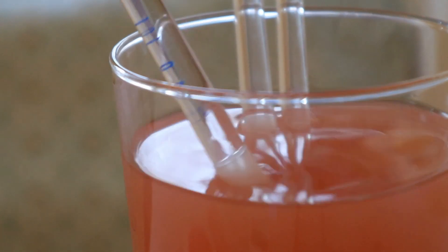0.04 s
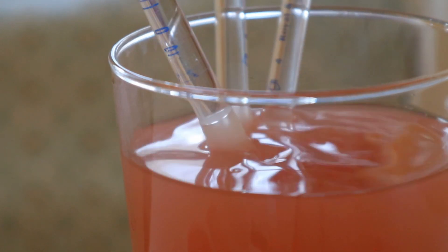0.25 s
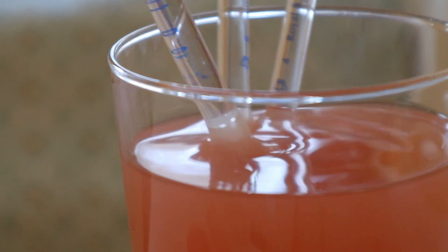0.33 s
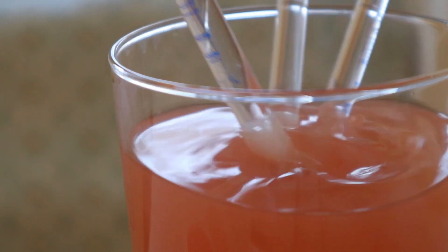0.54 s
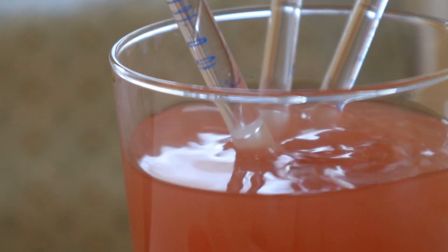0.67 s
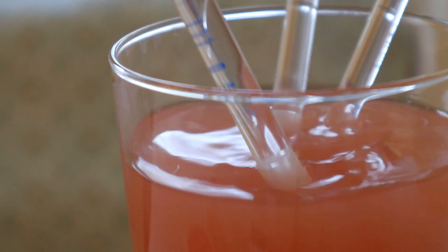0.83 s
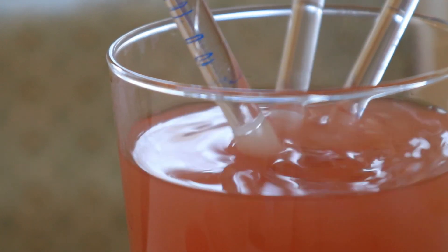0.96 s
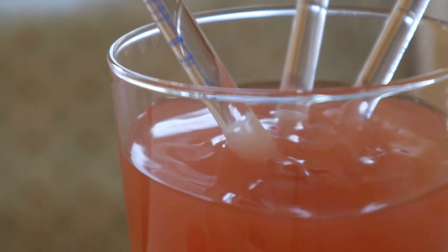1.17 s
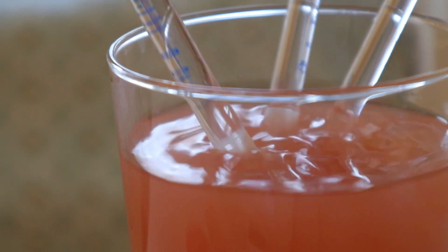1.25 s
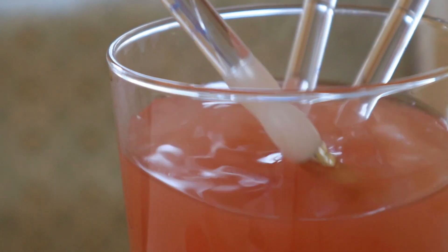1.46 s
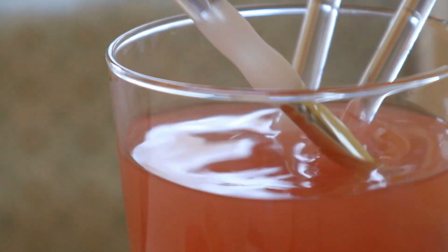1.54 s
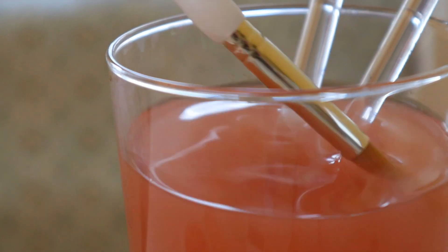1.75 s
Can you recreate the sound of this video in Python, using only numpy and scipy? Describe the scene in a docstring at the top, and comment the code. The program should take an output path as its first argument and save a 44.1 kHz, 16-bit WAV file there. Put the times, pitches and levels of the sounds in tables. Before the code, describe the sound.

Bright, uneven clinks of brush handles knocking on a filled glass as the liquid is stirred.

```python
"""Water laps faintly over low room noise as a brush is swished in a glass; then brush handles knock
and chatter against the glass, close by. Each knock rings the bright modes of the wall and the hollow
modes of the filled glass, makes a dry clack in the handle and a dull thud in the table below.
A small room answers the knocks."""
import sys
import numpy as np
from scipy import signal
from scipy.fft import irfft
from scipy.io import wavfile
from scipy.ndimage import uniform_filter1d

SR = 44100
rng = np.random.default_rng(int(sys.argv[2]) if len(sys.argv) > 2 else 0)


def master(y):
    """Save y as 16-bit WAV."""
    cut = np.clip(np.atleast_2d(y).T, -1, 1)
    pcm = np.round(cut * 32767)  # scale
    wavfile.write(sys.argv[1], SR, pcm.astype(np.int16))


N = 79380
PIVOT_HZ = 4000  # reference for tilts and ring times


def undb(db):
    """Decibels to gain."""
    return 10 ** (np.asarray(db) / 20)


def fade(t, t60_s):
    """Exponential decay, 60 dB down at t60_s."""
    return np.exp(-np.log(1000) * t / t60_s)


def pan(db):
    """Stereo gains for a left-minus-right level."""
    return undb(np.array([[db], [-db]]) / 2)


def noise(spectrum, size, tilt_db_per_oct=0):
    """Coloured noise, set to rms 1, then tilted; the tilt levels off two octaves below the pivot."""
    hz = np.maximum(np.arange(size // 2 + 1) * SR / size, 1)
    freq_hz, level_db = np.array(spectrum).T
    gain = undb(np.interp(np.log(hz), np.log(freq_hz), level_db))
    gain /= np.sqrt(np.mean(gain ** 2))
    gain *= undb(tilt_db_per_oct * np.log2(np.maximum(hz, PIVOT_HZ / 4) / PIVOT_HZ))
    phasors = np.exp(2j * np.pi * rng.random(len(hz)))
    return irfft(gain * phasors, size) * np.sqrt(size)


def drift(rate_hz):
    """Smooth random drift, standard deviation 1."""
    hold = int(SR / rate_hz)
    steps = rng.standard_normal(N)[np.arange(N) // hold]
    smooth = uniform_filter1d(uniform_filter1d(steps, hold), hold)
    return smooth / smooth.std()


def diffuse(mid, side, wide_above_hz=444.4):
    """Stereo from two noises: alike in the bass, unrelated in the treble."""
    side = signal.sosfilt(signal.butter(1, wide_above_hz, "high", fs=SR, output="sos"), side)
    return mid + side * np.array([[1], [-1]])


# Lapping spectrum: freq_hz, level_db
LAP_SPECTRUM = [(30, -61), (90, -10), (165, 4), (240, 0), (400, -15), (1000, -21), (3000, -19.5),
                (10000, -40)]
# Lapping envelope: time_s, level_db
LAP_ENVELOPE = [(0, -69), (.2, -66), (.5, -61.5), (.9, -60.5), (1.2, -64), (1.55, -63.5), (1.69, -69),
                (1.8, -67.5)]


def water(swell_db=5, swell_rate_hz=9):
    """Soft lapping that swells and sinks with the stirring."""
    level_db = np.interp(np.arange(N) / SR, *np.array(LAP_ENVELOPE).T)
    level_db += swell_db * drift(swell_rate_hz)
    return undb(level_db) * diffuse(noise(LAP_SPECTRUM, N), noise(LAP_SPECTRUM, N))


# Room noise spectrum: freq_hz, level_db
BACKGROUND_SPECTRUM = [(12, -43.5), (20, -11.5), (60, 2), (249, -8), (336, -2.5), (375, -10), (455, -7),
                       (1220, -14.5), (1520, -17), (14000, -42.5)]


def background(level_db=-62):
    """Steady low room noise."""
    return undb(level_db) * diffuse(noise(BACKGROUND_SPECTRUM, N), noise(BACKGROUND_SPECTRUM, N))


# Bright modes of the glass wall, one list each: pitch_hz, level_db, left_minus_right_db
WALL_PITCH_HZ = [3374, 3405, 4358, 5252, 5379, 5405, 5804, 6790, 7259, 7302, 7601, 9480, 9648, 10350, 10560,
                 10850, 11110, 12220, 12280, 13520]
WALL_LEVEL_DB = [0.5, 3, -22.5, -4.5, 1, 0.5, -1.5, -9, -2.5, -21.5, -18.5, -8, -11, -17.5, -16.5, -13, -19,
                 -13, -14.5, -33]
WALL_BALANCE_DB = [-11, -3.5, 6.5, 10.5, -4.5, 7.5, -11.5, 2.5, 2, 3, 4, 1.5, 4.5, 0, -5, -4, 6, -5.5, 5.5,
                   1.5]
WALL_MODES = list(zip(WALL_PITCH_HZ, WALL_LEVEL_DB, WALL_BALANCE_DB))
# Hollow low modes of the filled glass, one list each: pitch_hz, level_db, left_minus_right_db
BOWL_PITCH_HZ = [902, 975, 1056, 1135, 1925, 1967, 2000]
BOWL_LEVEL_DB = [-11.5, -6, -3.5, -22.5, -4.5, 1, -13]
BOWL_BALANCE_DB = [10.5, -2.5, -0.5, -5.5, -3.5, 5, -17]
BOWL_MODES = list(zip(BOWL_PITCH_HZ, BOWL_LEVEL_DB, BOWL_BALANCE_DB))


def glass_ring(t, modes, pivot_t60_s, right_lag_s, tilt_db_per_oct=0, scatter_db=2, detune=0.0019):
    """Struck glass rings in its modes; strike spot scatters their levels, moving water their pitch."""
    stereo_t = np.maximum(np.array([t, t - right_lag_s]), 0)
    out = 0
    for pitch_hz, level_db, balance_db in modes:
        spot, slosh = rng.standard_normal(2)
        gain = undb(level_db + tilt_db_per_oct * np.log2(pitch_hz / PIVOT_HZ) + scatter_db * spot)
        decay = fade(t, pivot_t60_s * (PIVOT_HZ / pitch_hz) ** 0.33)  # high modes die sooner
        tone = np.sin(2 * np.pi * pitch_hz * (1 + detune * slosh) * stereo_t)
        out += gain * pan(balance_db) * decay * tone
    return out / 2


# Handle clack spectrum: freq_hz, level_db
CLACK_SPECTRUM = [(100, -25.5), (400, -17.5), (750, -13.5), (1050, 3.5), (1500, -12), (2200, 1.5),
                  (3000, -3), (4200, 1.5), (4800, -2.5), (6100, 7.5), (6500, -9), (7600, 6), (8000, -30.5),
                  (9150, -22.5), (9550, 7), (11000, 0.5), (12300, -12.5), (12700, -14), (14500, -34.5)]


def handle_clack(t, tilt_db_per_oct, crack_db=5, spread=0.89, right_lag_s=0.00014):
    """A sharp crack at the contact, then the handle's dense, quickly damped ringing."""
    envelope = undb(crack_db) * fade(t, t60_s=0.0085) + fade(t, t60_s=0.047)
    common, left, right = (noise(CLACK_SPECTRUM, len(t), tilt_db_per_oct) for _ in range(3))
    common = np.array([common, np.roll(common, round(right_lag_s * SR))])
    stereo = np.sqrt(1 - spread ** 2) * common + spread * np.array([left, right])
    return pan(db=-0.5) * envelope * stereo / 2


# Table thud spectrum: freq_hz, level_db
THUD_SPECTRUM = [(30, -45.5), (70, -13), (120, -20.5), (160, 1), (215, 3.5), (290, -4), (345, -3),
                 (420, -18), (525, -7.5), (620, -13), (800, -34.5), (1020, -4.5), (1400, -16),
                 (3000, -46.5)]


def table_thud(t, attack_s=0.0038):
    """The push passes through the glass into the table as a dull thud."""
    envelope = (1 - np.exp(-t / attack_s)) * fade(t, t60_s=0.15)
    return envelope * diffuse(noise(THUD_SPECTRUM, len(t)), noise(THUD_SPECTRUM, len(t)))


# Handle strikes: start_s, wall_db, wall_tilt_db_per_oct, bowl_db, clack_db, clack_tilt_db_per_oct,
# thud_db
STRIKES = [ (0.2143, -28, 4, -33, -22, 3.5, -44.5), (.2410, -41.5, 4.5, -50, -20, -5, -46),
           (.2490, -43, 1, -31.5, -45, 0, -44), (.2570, -32, -0.5, -44, -42.5, -9.5, -74),
           (0.286, -59, 8, -66, -39, 3, -55), (0.31, -42.5, -0.5, -38, -38, -4, -51.5),
           (.3250, -41.5, 1, -53, -36.5, -9, -45.5), (.3360, -40.5, -2, -39.5, -43, 3, -48),
           (.3590, -47, 1, -57, -36.5, -7, -43.5), (.3720, -44.5, 4, -45.5, -32.5, -2.5, -46),
           (0.3807, -38.5, -8, -41, -34.5, -2, -56), (0.39, -47, 2, -47, -55, -13, -61),
           (.5400, -56, 4, -46.5, -61, -12, -48.5), (0.552, -63.5, -2, -44.5, -65.5, 1, -50.5),
           (0.5974, -47, -1.5, -51, -43, -10, -54), (.6160, -68, 11, -72, -63, 0, -49.5),
           (.7008, -43, 5, -40, -46, 0, -37), (0.7077, -31, -7.5, -42, -38, 0.5, -52.5),
           (0.7408, -33, -6, -37.5, -31, -6.5, -40.5), (.7595, -39.5, 0, -42, -46, -10.5, -46.5),
           (.7790, -35, -5, -49, -31, -3.5, -45), (.8310, -65, 3, -71, -69, 18, -77),
           (0.858, -61, -0.5, -58.5, -56.5, 2, -51.5), (.9100, -56, -14.5, -59, -53, -5.5, -53.5),
           (1.0450, -45.5, 1, -47.5, -47, -8.5, -44.5), (1.0530, -47.5, -5.5, -41, -40, -3, -50),
           (1.0650, -71, -6.5, -56.5, -44.5, -14.5, -49), (1.1020, -52, -1.5, -49, -37, -8.5, -48.5),
           (1.1160, -58.5, -11, -44, -41, -7, -51.5), (1.296, -54.5, 4.5, -44.5, -42.5, -10.5, -46.5),
           (1.301, -51, -4, -57, -48.5, -2.5, -40.5), (1.31, -54, -6, -38, -59.5, -17, -56),
           (1.321, -51.5, -13.5, -44.5, -57, -7, -55), (1.407, -69, 7, -57, -44, -4, -57),
           (1.427, -51.5, -7, -48.5, -42.5, -5.5, -51)]


def knocks(hard_contact_s=0.00033, hard_wall_db=-27.5, db_per_doubling=8.5):
    """Each knock sounds glass, handle and table; a softer one slides and builds up for longer."""
    t = np.arange(SR // 3) / SR
    out = np.zeros((2, N + len(t)))
    for start_s, wall_db, wall_tilt, bowl_db, clack_db, clack_tilt, thud_db in STRIKES:
        contact_s = hard_contact_s * 2 ** ((hard_wall_db - wall_db) / db_per_doubling)
        attack = 1 - np.exp(-t / contact_s)
        wall = undb(wall_db) * glass_ring(t, WALL_MODES, pivot_t60_s=0.17, right_lag_s=0.00014,
                                          tilt_db_per_oct=wall_tilt)
        bowl = undb(bowl_db) * glass_ring(t, BOWL_MODES, pivot_t60_s=0.12, right_lag_s=0.00008)
        clack = undb(clack_db) * handle_clack(t, clack_tilt)
        thud = undb(thud_db) * table_thud(t)
        start = int(start_s * SR)
        out[:, start:start + len(t)] += attack * (wall + bowl + clack) + thud
    return out[:, :N]


def room(direct, level_db=-7.5, delay_s=0.0037, crossover_hz=900):
    """Diffuse reflections of a small room; the treble dies first."""
    t = np.arange(SR // 2) / SR
    white = diffuse(*rng.standard_normal((2, len(t))))
    bass = signal.sosfilt(signal.butter(1, crossover_hz, fs=SR, output="sos"), white)
    treble = white - bass
    tail = (bass * fade(t, t60_s=0.33) + treble * fade(t, t60_s=0.11)) * (t > delay_s)
    tail /= np.sqrt(np.sum(tail ** 2, axis=1, keepdims=True))
    return undb(level_db) * signal.fftconvolve(direct, tail, axes=1)[:, :N]


def scene():
    """Water and room noise under the knocks and their reflections."""
    hits = knocks()
    reflections = room(hits)
    return water() + background() + hits + reflections


def record(dry):
    """The recorder cuts the deepest rumble and the top treble."""
    low_cut_hz, high_cut_hz = 38, 13800
    dry = signal.sosfilt(signal.butter(3, low_cut_hz, "high", fs=SR, output="sos"), dry)
    return signal.sosfilt(signal.ellip(8, .2, 70, high_cut_hz, fs=SR, output="sos"), dry)


dry = scene()
out = record(dry)
master(out)
```